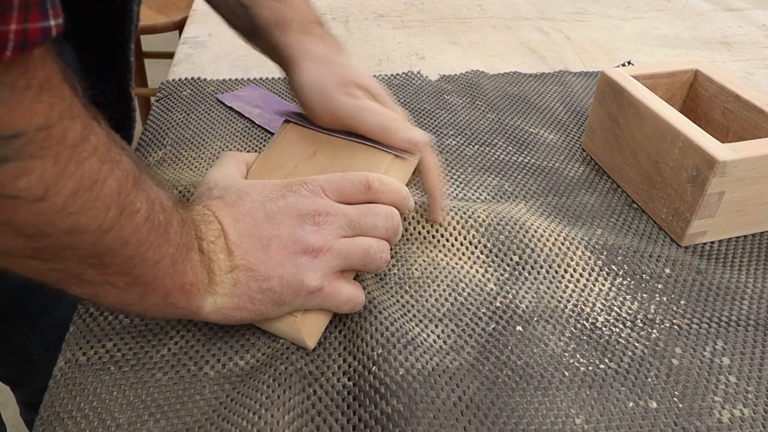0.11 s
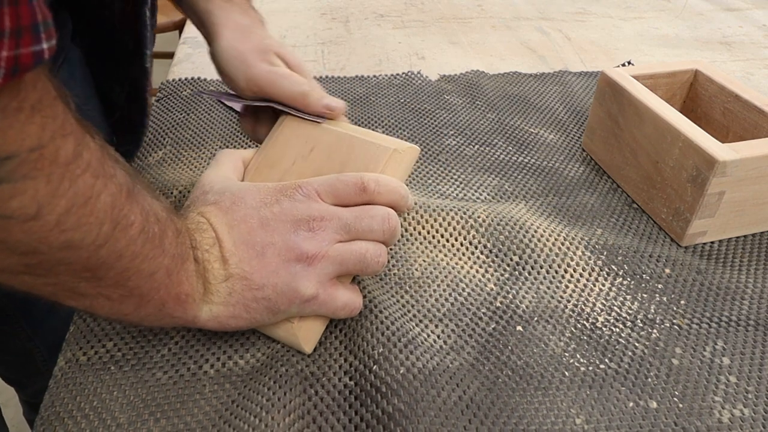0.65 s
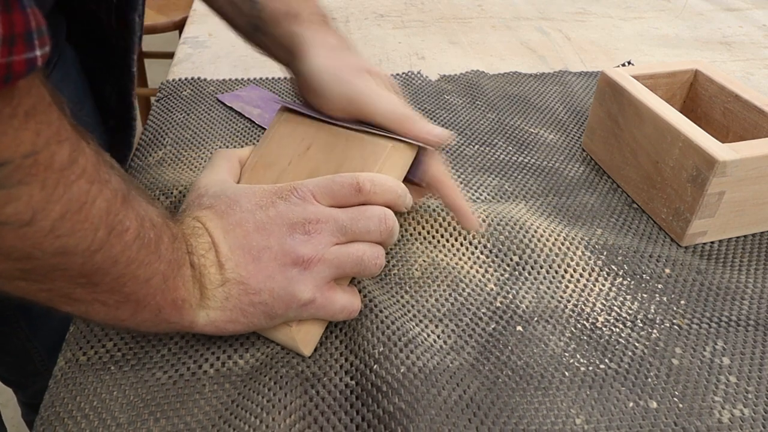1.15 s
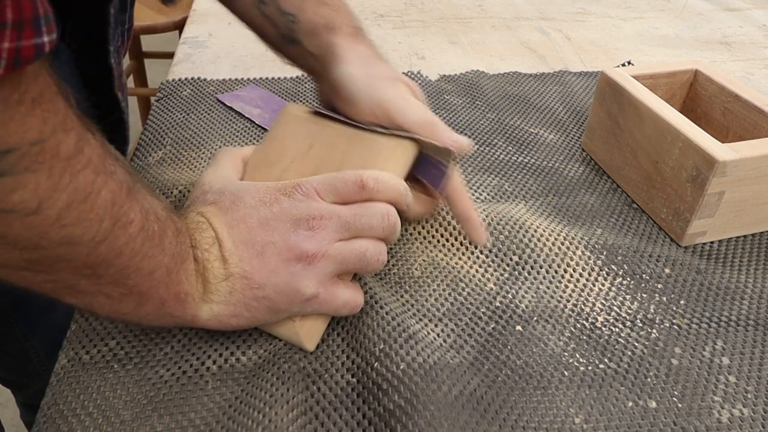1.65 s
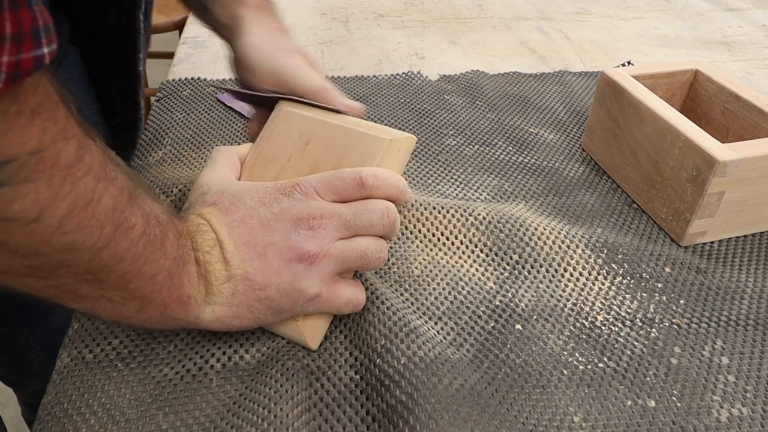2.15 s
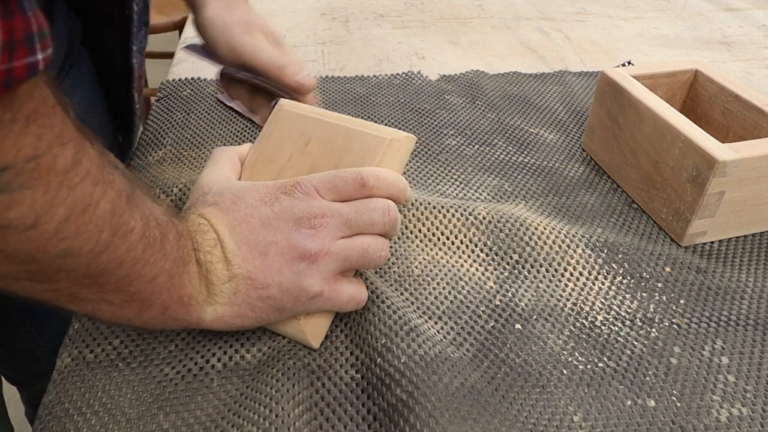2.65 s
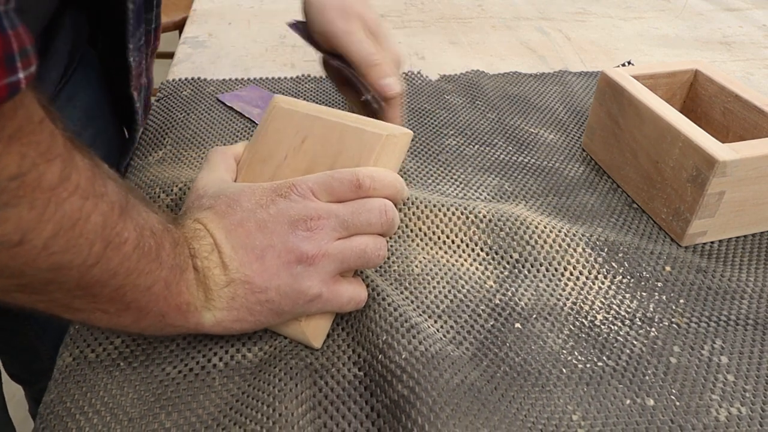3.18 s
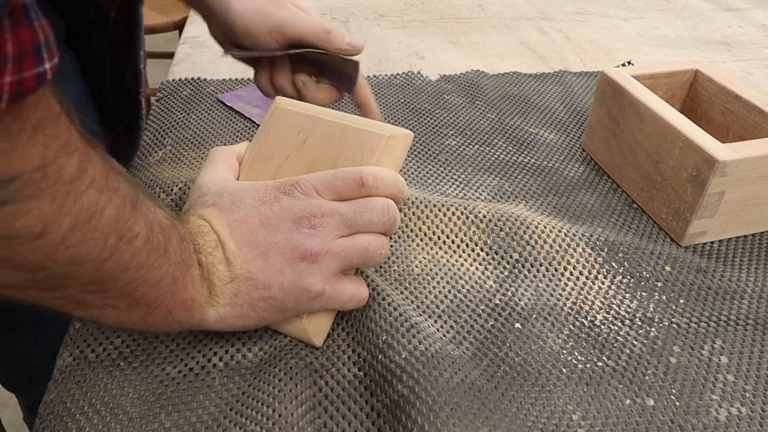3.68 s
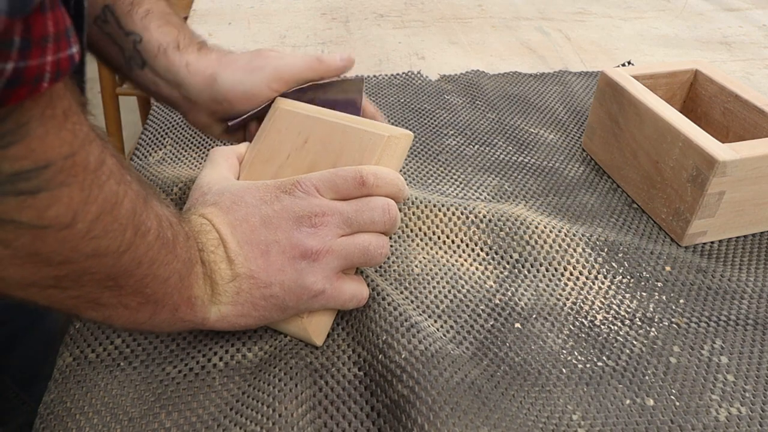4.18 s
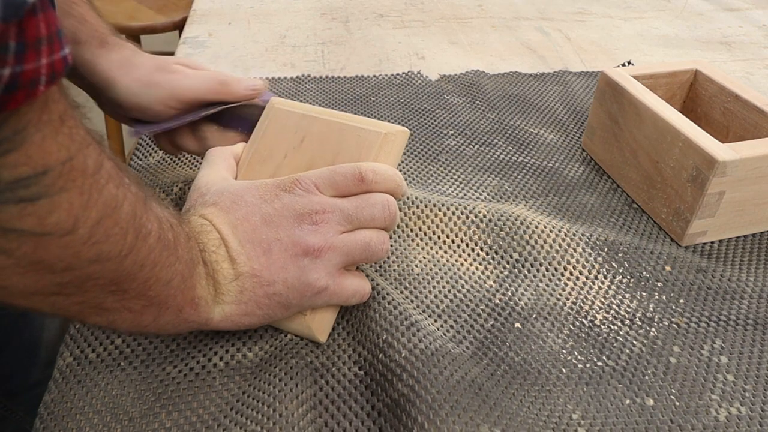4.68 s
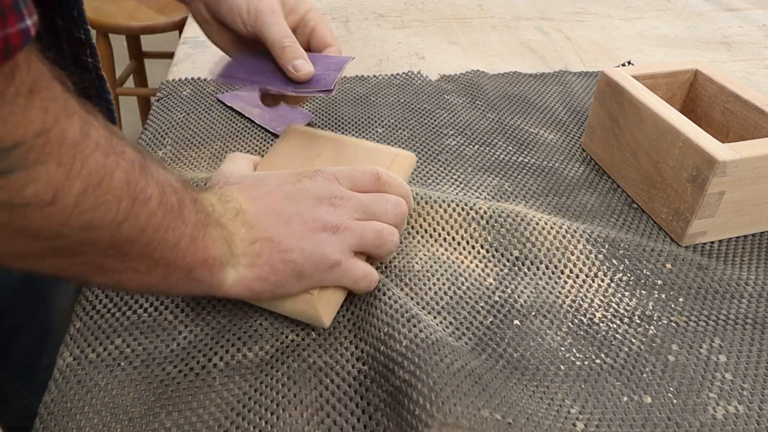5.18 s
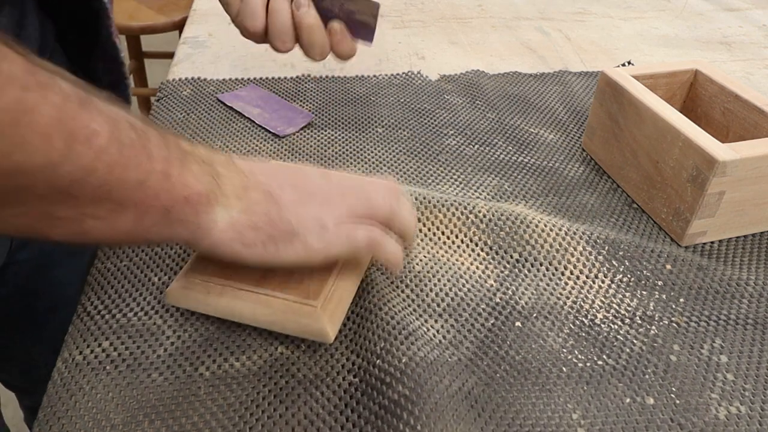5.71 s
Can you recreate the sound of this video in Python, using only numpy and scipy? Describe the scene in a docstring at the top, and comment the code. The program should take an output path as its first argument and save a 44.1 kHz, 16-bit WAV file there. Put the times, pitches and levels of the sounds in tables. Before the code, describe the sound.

Close up in a small workshop, sandpaper rubs a wooden lid edge in rapid back-and-forth rasps, about five scrapes a second, with light low rumble from the bench. After a brief gap come five separate strokes, each a papery slap and short scrape with a woody knock. Finally the paper rustles faintly and the lid slides softly on the mat over a quiet hush. Centred, mono sound.

```python
"""In a small workshop a hand rubs sandpaper to and fro over the edge of a wooden lid held on a bench mat,
then slaps it on for five single strokes; afterwards the paper rustles and the lid slides flat.
Random tears, thousands a second, ring wood, paper and grit through one colour each; landings add decaying
modes and noise bursts; bench and lid rumble as low noise. Decaying noise tails answer for the room,
over a steady hush, with the same sound on both channels."""
import sys
import numpy as np
from scipy import signal
from scipy.fft import rfft, irfft, next_fast_len
from scipy.io import wavfile
from scipy.ndimage import uniform_filter1d, map_coordinates

SR = 44100
rng = np.random.default_rng(int(sys.argv[2]) if len(sys.argv) > 2 else 0)


def amplitude_ratio(level_db):
    """Convert a level in decibels to the matching linear amplitude (field) ratio."""
    exponent = np.asarray(level_db, float) / 20
    return 10 ** exponent


def generate_wav(signal):
    """Clip the signal to [-1, 1] and save it as 16-bit WAV at the path in sys.argv[1]."""
    frames = np.transpose(np.atleast_2d(signal))
    scaled = np.clip(frames, -1, 1) * 32767
    pcm = np.round(scaled).astype(np.int16)
    wavfile.write(sys.argv[1], SR, pcm)


N = 257103  # samples

# Colours of the rubbing layers and of the treble of loose paper and mat: f/Hz, relative level/dB
RASP_COLOUR = [(2120, -62.5), (3600, -9), (4400, 4), (5500, -6), (6300, -8), (8190, -63), (13900, -120)]
WOOD_COLOUR = [(500, -24), (850, -11.5), (973, -8), (1060, -6.5), (1980, -4.5), (2260, -1), (2700, -4),
               (3510, -25), (5940, -120)]
DRAG_COLOUR = [(1470, -17.5), (2500, -12), (3200, 7), (3800, 1.5), (4940, -46.5), (8360, -120)]
GRIT_COLOUR = [(3410, -56), (5800, -15), (6390, -6.5), (7260, 2), (9210, -3.5), (9990, -3), (12000, -5),
               (15100, -11), (16000, -24.5)]
RUSTLE_COLOUR = [(3410, -24), (5800, -9.5), (7290, 0.5), (11200, -1), (15000, -7.5), (16000, -11)]
# Colours of the bench rumble, the lid rumble and the workshop hush: f/Hz, relative level/dB
BENCH_COLOUR = [(18, -31.5), (34, -8.5), (45, -1), (97, -3), (145, 0.5), (210, -2.5), (330, -12),
                (500, -17.5), (900, -48), (2000, -120)]
LID_COLOUR = [(120, -33.5), (220, -1), (320, -1), (408, 4), (543, 4), (727, -2.5), (950, -0.5), (1300, -5),
              (2000, -36), (4000, -120)]
HUSH_COLOUR = [(410, -33), (700, -15), (818, -36.5), (1050, -30), (1150, -9.5), (1340, -18), (3190, -3.5),
               (4240, -8), (6020, -7), (15500, -21)]
# Narrow resonances of the rubbed edge: f/Hz, width/Hz, lift/dB (negative dips)
EDGE_PEAKS = [(1100, 18, -4.5), (1515, 230, 3), (1940, 36, 3.5), (3470, 47, 4), (3996, 253, 4),
              (4380, 49, -4.5), (4600, 200, -0.5), (6520, 77, 7), (8150, 130, 2), (8400, 47, 3.5),
              (10550, 120, 3.5)]
# Broad lid modes rung by single strokes wrapping the corner: f/Hz, width/Hz, lift/dB (negative dips)
CORNER_PEAKS = [(1020, 500, 4.5), (2310, 980, 3), (3660, 130, 6), (4510, 250, 4.5), (5700, 205, -2)]

# Strokes away from the body, fastest early:
# touch t/s, time to fastest/s, time to lift/s, base rasp level/dB, base loss off top speed/dB
PUSH_STROKES = [(.11, 0.048, 0.12, -17, 4), (.489, 0.039, .13, -17, 6), (.884, 0.045, .13, -17, 10.5),
                (1.277, 0.046, 0.14, -18, 13.5), (1.677, 0.035, 0.13, -18, 10.5),
                (2.067, 0.046, 0.14, -16.5, 13.5), (2.451, 0.05, 0.18, -16.5, 10)]
# Strokes back, fastest late: same columns
PULL_STROKES = [(-.1, 0.061, 0.13, -13.5, 11), (.286, 0.088, .14, -15.5, 10),
                (.679, 0.096, 0.14, -15, 16.5), (1.067, 0.11, 0.14, -14.5, 23.5),
                (1.469, 0.1, 0.13, -14.5, 20.5), (1.854, 0.11, 0.13, -14.5, 23),
                (2.25, 0.098, 0.14, -15, 26)]
# Single strokes over the corner: same columns
SWIPE_STROKES = [(3.03, 0.051, 0.099, -19, 18.5), (3.441, .033, 0.092, -19, 15),
                 (3.899, 0.047, 0.11, -20.5, 8.5), (4.226, 0.053, 0.13, -18, 17),
                 (4.622, .05, 0.084, -24.5, 1.5)]
# Landed paper skidding before a single stroke: same columns
SKID_STROKES = [(3.845, .035, 0.076, -30, 15), (4.186, .004, .018, -35.5, 8.5),
                (4.221, .005, 0.0116, -38, 6), (4.603, .015, 0.038, -42, 6)]
# Paper rustling in the hand:
# start t/s, time to loudest/s, time to end/s, rasp level/dB, dull-tone drive/dB (scaled for each layer)
RUSTLE_MOVES = [(4.91, .02, 0.034, -57, 4), (4.968, 0.018, 0.042, -48.5, 4.5), (5.016, 0.029, .025, -51, 1),
                (5.05, .03, .04, -56.5, 8.5), (5.082, 0.021, 0.018, -38, -6.5),
                (5.118, .009, 0.029, -43.5, -4), (5.182, 0.026, 0.03, -38, -1.5),
                (5.287, 0.014, 0.053, -47.5, -1.5), (5.347, .012, 0.075, -49, 4.5),
                (5.372, 0.021, .06, -44, 4), (5.47, 0.019, .03, -56.5, -2), (5.688, .022, 0.039, -43, -13),
                (5.744, .016, 0.095, -57.5, 8)]
# Lid sliding flat on the mat: same columns
SLIDE_MOVES = [(5.43, 0.027, 0.1, -55, 6), (5.54, .08, 0.14, -54, 5)]
# Rows wood tone, dull drag, fine grit:
# level/dB re rasp at its fastest, share of the loss while gathering speed, share while slowing
PUSH_LAYERS = [(-10.5, 2, 0.3), (-9.5, 1.2, 0.3), (-0.5, 2.1, 1)]
PULL_LAYERS = [(-12, 0.12, 0.48), (-11, .05, 0.82), (-2, 0.7, 1.5)]
SWIPE_LAYERS = [(-8, .8, 0.85), (-10, 0.91, 0.68), (-5.5, 1, 0.72)]
SKID_LAYERS = [(-3, .6, 1), (-7.5, .6, 0.99), (-6.5, 1, .9)]
LOOSE_LAYERS = [(0, 0.56, 0.84), (-9.5, 0.79, 0.84), (0.4, 0.92, 1)]
# How far the dull-tone drive moves each layer: wood, drag, grit [dB per dB]
DULL_SHARES = (0.88, 1.9, .4)
# How hard the hand presses and how flat the paper lies: t/s, pressure level/dB, flatness level/dB
HAND_PRESSURE = [(0, 3, -.5), (.15, 4.5, 1), (.23, 1.5, -4.5), (.4, 2, 0), (.54, -0.5, -3), (.62, 2, -5),
                 (.8, -3, 0.2), (.93, -0.5, 2.5), (1.1, 0.5, -1.5), (1.2, -3.5, -2.5), (1.33, 0.6, 1.5),
                 (1.49, 1.5, -1.5), (1.57, 0.5, -0.5), (1.72, -2.5, 1), (1.88, 0.5, -2), (1.97, -0.5, 0.5),
                 (2.12, 1.5, 2.5), (2.28, -1, -2), (2.36, 0.5, 3), (2.52, .3, 1.5), (2.64, -2, -1.5),
                 (3.082, -3.5, -2), (3.46, -2.5, -0.5), (3.52, -2.5, 0), (3.92, 3, 3.5), (3.98, 0, -1),
                 (4.19, 2, -4), (4.24, 9.5, 2), (4.281, 4, 4), (4.33, 2.3, -1), (4.64, 3, -0.2),
                 (4.71, 0.1, 1.8)]

# Jolts of the lid on the bench, swelling up to t: t/s, deep bench level/dB, lid level/dB, rise/s
LID_JOLTS = [(.712, -47, -44, 0.023), (.91, -46, -42.5, .02), (1.142, -46, -43, 0.048),
             (1.229, -41, -57, .02), (2.476, -43, -43.5, .02), (2.999, -42, -46, 0.0034),
             (3.081, -37.5, -34, 0.15), (3.418, -34, -38, 0.0015), (3.468, -43, -32, 0.041),
             (3.862, -35, -32.5, 0.012), (3.931, -38.5, -28, 0.055), (4.186, -55, -45, .003),
             (4.286, -26.5, -27.5, 0.095), (4.6, -26.5, -34.5, .003), (4.68, -51, -42, .04),
             (5.08, -63, -52, 0.059), (5.2, -65, -55, 0.017), (5.402, -58, -50, 0.032),
             (5.7, -58, -72, 0.027)]
# How fast the room dies away at each frequency: f/Hz, t60/s
ROOM_DECAY = [(100, 0.63), (700, 0.16), (2000, 0.62), (5000, 0.41), (12000, 0.28)]
# Paper landing on the wood, and small ticks:
# t/s, overall level/dB, knock level/dB and thud level/dB re overall, flattening time/s
LANDINGS = [(2.998, -15.5, -7, -35, 0.011), (3.0197, -23, -17, -18, .002), (3.418, -12.5, -6, -15, 0.011),
            (3.839, -9.5, -25, -21, .008), (4.1864, -17.5, -9.5, -36, .005),
            (4.5993, -10.5, -13, -11.5, 0.0077), (4.7184, -17, -25, -17, .002),
            (4.9409, -34.5, -26, -31, 0.00194), (5.24, -36, -17, -8, .003)]
# Struck modes of the paper, the middle of the lid, and the low lid and bench: f/Hz, mean level/dB, t60/s
PAPER_MODES = [(1680, 3.5, 0.013), (2400, -10, .007), (2880, -3, 0.027), (3795, 6, 0.02),
               (4620, -5.5, 0.024), (7200, -33, .005)]
KNOCK_MODES = [(340, -4, 0.043), (464, 6, 0.0089), (646, -6, 0.033), (850, 2, 0.019), (1020, 3, 0.02),
               (1260, 4, 0.0097)]
THUD_MODES = [(44.7, -13.5, 1), (84, -11, 0.068), (133, -6.5, 0.11), (208, -6, 0.13), (303, -12, 0.035)]

# Motion of each kind of stroke: bite/s, gathering/s, slowing/s, lift-off/s
PUSH_MOTION, PULL_MOTION = (0.016, 0.042, 0.051, 0.035), (0.013, 0.083, 0.085, 0.033)
SWIPE_MOTION, SKID_MOTION = (0.012, 0.035, 0.068, 0.03), (0.01, 0.056, 0.018, 0.02)
CRINKLE_MOTION, GLIDE_MOTION = (0.008, 0.014, 0.027, 0.021), (0.02, 0.06, 0.08, 0.033)


def unit(x):
    """Scale a sound to rms 1."""
    return x / np.sqrt(np.mean(x ** 2) + 1e-20)


def along(points, hz):
    """Read a curve of (Hz, value) points on a log frequency axis."""
    f, value = np.transpose(points)
    return np.interp(np.log(hz + 1), np.log(f + 1), value)


def coloured(x, spectrum):
    """Filter a sound through a colour and bring it to rms 1."""
    m = next_fast_len(N + 8192)
    gain = amplitude_ratio(along(spectrum, np.fft.rfftfreq(m, 1 / SR)))
    return unit(irfft(rfft(x, m) * gain, m)[:N])


def resonant(x, peaks):
    """Lift or dip a sound at causal resonances, as a ringing body does."""
    m = next_fast_len(N + 8192)
    f = np.fft.rfftfreq(m, 1 / SR)
    response = 1
    for centre, width, db in peaks:
        band = 1j * f * width / (centre ** 2 - f ** 2 + 1j * f * width)
        response = response + (amplitude_ratio(db) - 1) * band
    return irfft(rfft(x, m) * response, m)[:N]


def wobble(rate):
    """Smooth random curve with the given number of knots a second."""
    knots = rng.standard_normal(int(N * rate / SR) + 4)
    return map_coordinates(knots, [np.arange(N) * rate / SR])


def tearing(spread_db, clump_db, patchy_db):
    """Single fibre tears of uneven size on fine abrasion, in clumps, their colour shifting in patches."""
    tears_per_s = 11000
    size_db = spread_db * np.minimum(rng.exponential(size=N), 3)
    tears = (rng.random(N) < tears_per_s / SR) * rng.standard_normal(N) * amplitude_ratio(size_db)
    abrasion = 1.93 * rng.standard_normal(N)
    clumps = amplitude_ratio(clump_db * (wobble(250) + 0.14 * wobble(31)))
    grains = (unit(tears) + abrasion) * clumps
    z = signal.stft(grains, nperseg=256)[2]
    patches = uniform_filter1d(rng.standard_normal(z.shape), size=5, axis=0)
    patches = uniform_filter1d(patches, size=8, axis=1)
    return signal.istft(z * amplitude_ratio(patchy_db * unit(patches)), nperseg=256)[1][:N]


def effort(rows, motion, tone):
    """Gains of rasp, wood, drag and grit: the paper bites, gathers speed, slows, and lifts off."""
    bite, gather, slow, off = motion
    gains = np.zeros((4, N))
    for touch, fastest, lift, db, loss_db, dull_db in rows:
        at = np.arange(max(int(touch * SR), 0), min(int((touch + lift + off) * SR), N))
        t = at / SR - touch
        early = t < fastest
        away = np.abs(t - fastest) / np.where(early, gather, slow)
        lost_db = loss_db * (1 - np.exp(-away ** 1.47))  # power 1 = pointed top speed, 2 = rounded
        biting = np.clip(t / bite, 0, 1) ** 1.1
        lifting = np.clip(1 - (t - lift) / off, 0, 1) ** 1.26
        contact = amplitude_ratio(db) * biting * lifting
        layers = [(0, 1, 0.93)]  # rasp
        for (level, before, after), reach in zip(tone, DULL_SHARES):
            layers.append((level + reach * dull_db, before, after))
        for k, (level, before, after) in enumerate(layers):
            gains[k, at] += contact * amplitude_ratio(level - np.where(early, before, after) * lost_db)
    return gains


def strokes(rows, motion, tone):
    """Effort of sanding strokes that need no added dull tone."""
    return effort([(*row, 0) for row in rows], motion, tone)


def quick():
    """Layer gains for the to and fro of the hand."""
    pushes = strokes(PUSH_STROKES, PUSH_MOTION, PUSH_LAYERS)
    return pushes + strokes(PULL_STROKES, PULL_MOTION, PULL_LAYERS)


def rubbing(gains, grains, treble):
    """The same grains ring wood, paper and grit, each layer at its own gain."""
    grains = resonant(grains, EDGE_PEAKS)
    colours = (RASP_COLOUR, WOOD_COLOUR, DRAG_COLOUR, treble)
    return sum(gain * coloured(grains, colour) for gain, colour in zip(gains, colours))


def sanding():
    """Paper strokes along the edge, later over the corner; pressure and flatness tilt the layers."""
    corner_from_s = 2.9
    grains = tearing(spread_db=1.0, clump_db=0.5, patchy_db=2.0)
    corner = unit(resonant(grains, CORNER_PEAKS)) * np.std(grains)
    t = np.arange(N) / SR
    grains = np.where(t < corner_from_s, grains, corner)
    gains = quick() + strokes(SWIPE_STROKES, SWIPE_MOTION, SWIPE_LAYERS)
    gains += strokes(SKID_STROKES, SKID_MOTION, SKID_LAYERS)
    s, pressure, flatness = np.transpose(HAND_PRESSURE)
    # dB per dB of control, for rasp, wood, drag, grit
    colour_db = np.outer([-0.2, 1, 0.15, -0.2], np.interp(t, s, pressure))
    colour_db += np.outer([0, 0, -0.7, 1], np.interp(t, s, flatness))
    return rubbing(gains * amplitude_ratio(colour_db), grains, GRIT_COLOUR)


def rumble(levels_db, t60, rest_db, rub_db, lag):
    """Gain of a low rumble: at rest, lagging (s) under the quick strokes, and dying after each jolt."""
    t = np.arange(N) / SR
    keep = np.exp(-1 / (lag * SR))
    rub_power = (amplitude_ratio(rub_db) * quick()[1]) ** 2  # follows the wood tone
    power = amplitude_ratio(rest_db) ** 2 + signal.lfilter([1 - keep], [1, -keep], rub_power)
    for (s, _, _, rise), db in zip(LID_JOLTS, levels_db):
        swell = np.clip((t - s) / rise + 1, 0, 1) ** 2
        power += (swell * amplitude_ratio(db - 60 * np.maximum(t - s, 0) / t60)) ** 2
    return np.sqrt(power)


def rocking():
    """Low noise of bench and lid, moved by rubbing and jolts; the lid's level wavers."""
    _, bench_db, lid_db, _ = np.transpose(LID_JOLTS)
    bench = rumble(bench_db, t60=0.47, rest_db=-57, rub_db=-22.5, lag=0.08)
    lid = rumble(lid_db, t60=0.36, rest_db=-58.5, rub_db=-17.5, lag=0.043) * amplitude_ratio(1.6 * wobble(25))
    bench_noise = coloured(rng.standard_normal(N), BENCH_COLOUR)
    return bench * bench_noise + lid * coloured(rng.standard_normal(N), LID_COLOUR)


def hush():
    """Steady workshop air: coloured noise at a fixed low level."""
    return amplitude_ratio(-63) * coloured(rng.standard_normal(N), HUSH_COLOUR)


def workshop(x):
    """Room answer: each frequency dies at its own speed, with a fresh tail every third of a second."""
    wet, step = np.zeros(N + SR), SR // 3
    for start in range(0, N, step):
        hz, t, z = signal.stft(rng.standard_normal(SR * 2 // 3), SR, nperseg=256)
        decay = amplitude_ratio(-60 * t / along(ROOM_DECAY, hz)[:, None])
        tail = signal.istft(z * decay, SR, nperseg=256)[1]
        answer = signal.fftconvolve(x[start:start + step], tail / np.linalg.norm(tail))
        wet[start:][:len(answer)] += answer[:N + SR - start]
    return np.pad(wet, (300, 0))[:N]  # 300 samples before the room answers


def ring(modes, t):
    """Modes struck once, neighbours in opposite phase; the grip shifts strength and pitch by chance."""
    out = np.zeros(len(t))
    for k, (hz, db, t60) in enumerate(modes):
        level = amplitude_ratio(db + rng.normal(0, 2) - 60 * t / t60)
        out += (-1) ** (k + 1) * level * np.sin(2 * np.pi * hz * rng.normal(1, 0.05) * t)
    return out


def slaps():
    """Each landing: a crack, the paper flattening for a moment, a knock on the wood and a thud."""
    out, t = np.zeros(N + SR), np.arange(SR // 4) / SR
    for s, db, knock_db, thud_db, flatten in LANDINGS:
        crack = 0.52 * amplitude_ratio(-60 * t / 0.005) * rng.standard_normal(len(t))
        hiss = np.convolve(rng.standard_normal(len(t)), [0.5, 1, 0.5], "same")  # paper is soft: less treble
        flap = 0.33 * np.exp(-(t / max(flatten, 0.001)) ** 3) * hiss
        paper = 0.36 * (0.78 * ring(PAPER_MODES, t) + crack + flap)
        body = amplitude_ratio(knock_db) * ring(KNOCK_MODES, t) + amplitude_ratio(thud_db) * ring(THUD_MODES, t)
        out[round(s * SR):][:len(t)] += amplitude_ratio(db) * (paper + body)
    return out[:N]


def handling():
    """Loose paper and the lid on the mat: more uneven grains under a flatter treble."""
    # loss off the loudest moment: 9 dB for rustles, none for the slide
    rustles = [(*row[:4], 9, row[4]) for row in RUSTLE_MOVES]
    slide = [(*row[:4], 0, row[4]) for row in SLIDE_MOVES]
    gains = effort(rustles, CRINKLE_MOTION, LOOSE_LAYERS) + effort(slide, GLIDE_MOTION, LOOSE_LAYERS)
    return rubbing(gains, tearing(spread_db=5.5, clump_db=1.0, patchy_db=2.5), RUSTLE_COLOUR)


def scene():
    """Mix the near sounds, the room's answer, the rumble and the hush, alike on both channels."""
    near = sanding() + slaps() + handling()
    mono = near + amplitude_ratio(-17.0) * workshop(near) + rocking() + hush()
    return np.array([mono, mono])


def low_pass(x):
    """Removes everything above the highest recorded frequency."""
    return signal.sosfilt(signal.butter(12, 16660, fs=SR, output="sos"), x)


def record(dry):
    """Band-limit the mix with a steep cut of the top treble."""
    top_hz = 15750
    m = next_fast_len(N + 8192)
    passed = np.fft.rfftfreq(m, 1 / SR) < top_hz
    limited = irfft(rfft(dry, m) * passed, m)[:, :N]
    return low_pass(limited)


dry = scene()
out = record(dry)
generate_wav(out)
```